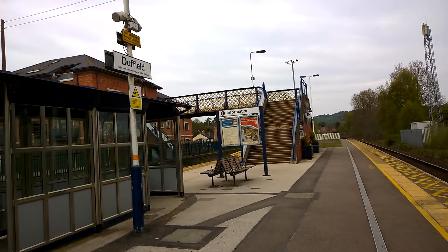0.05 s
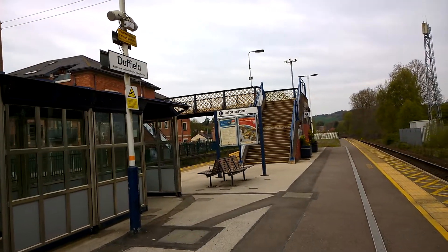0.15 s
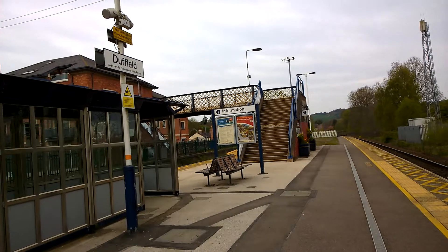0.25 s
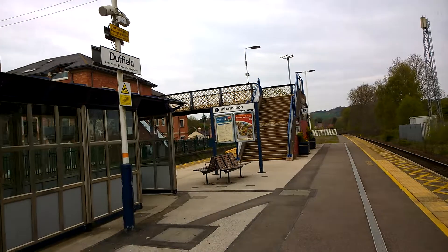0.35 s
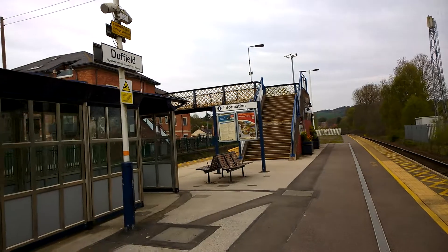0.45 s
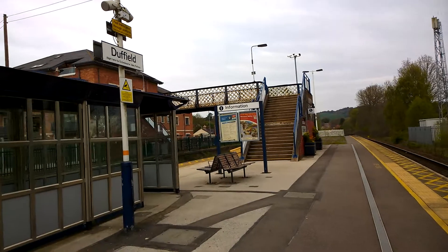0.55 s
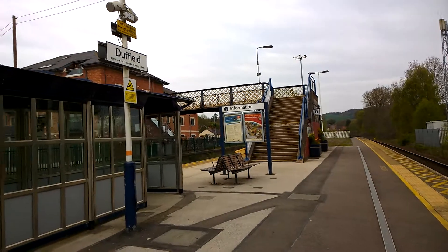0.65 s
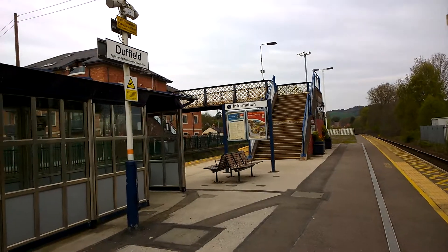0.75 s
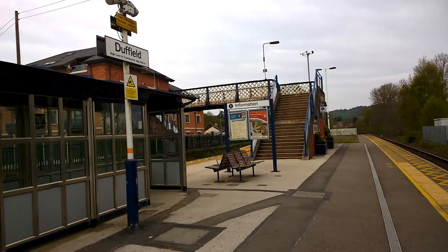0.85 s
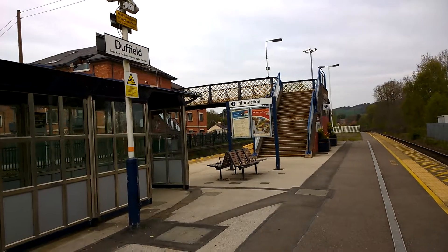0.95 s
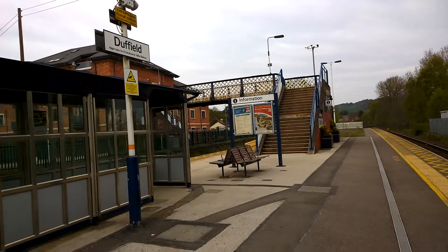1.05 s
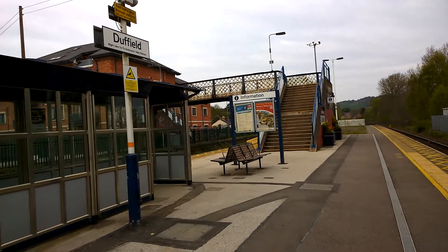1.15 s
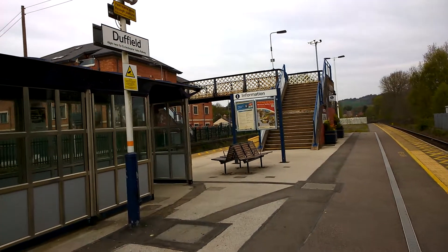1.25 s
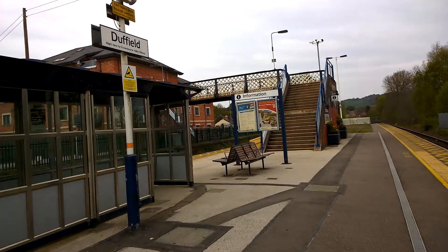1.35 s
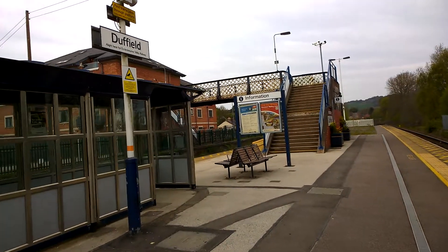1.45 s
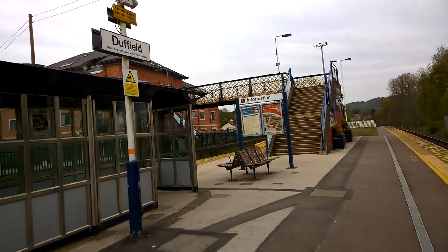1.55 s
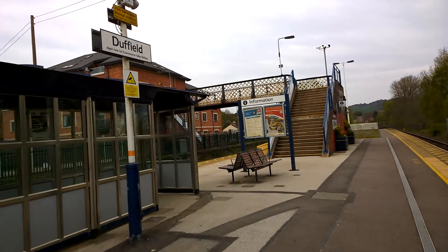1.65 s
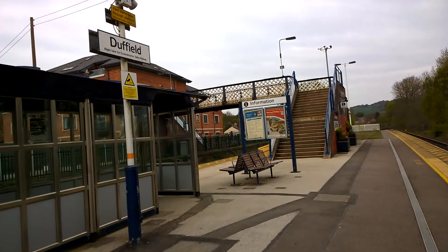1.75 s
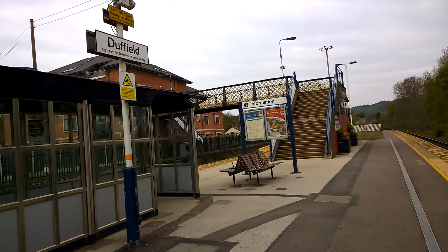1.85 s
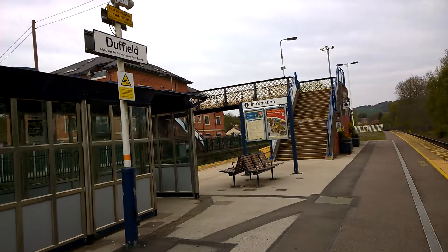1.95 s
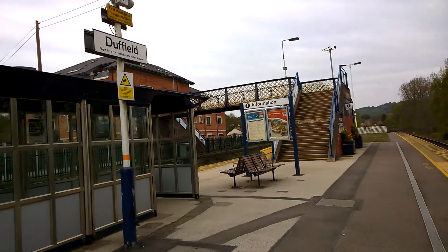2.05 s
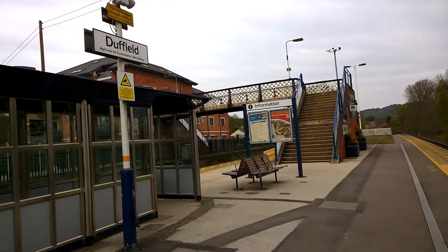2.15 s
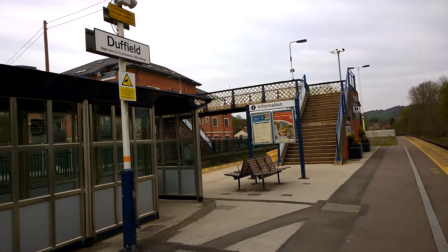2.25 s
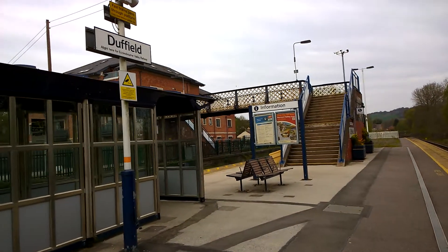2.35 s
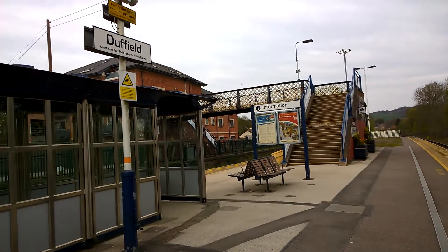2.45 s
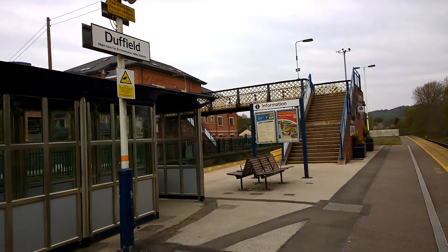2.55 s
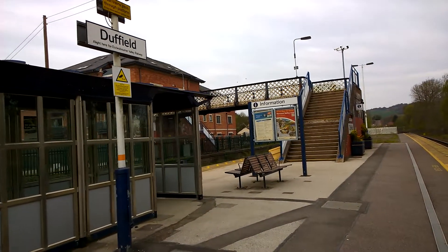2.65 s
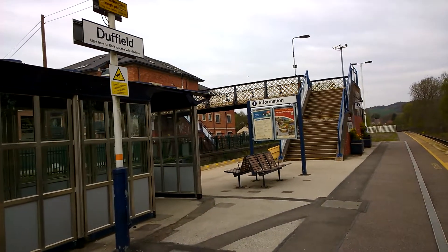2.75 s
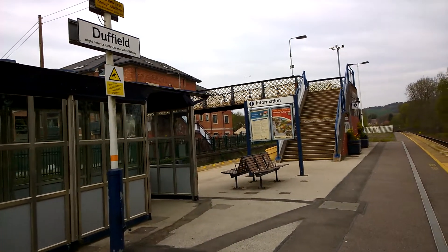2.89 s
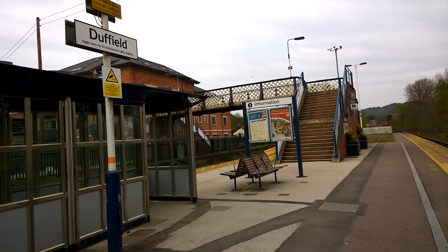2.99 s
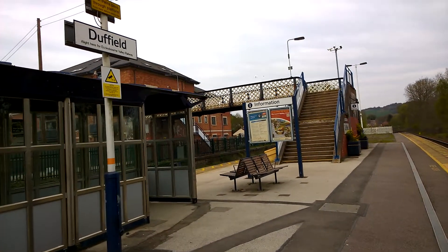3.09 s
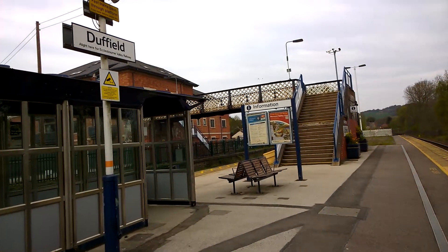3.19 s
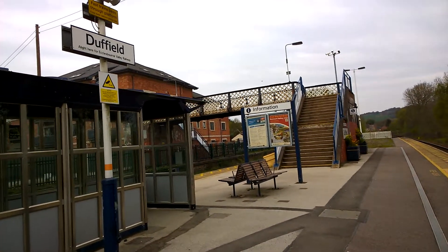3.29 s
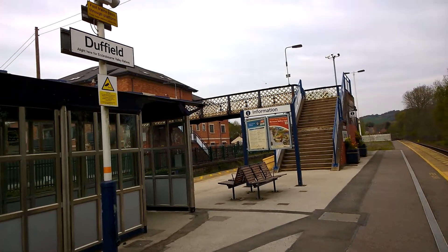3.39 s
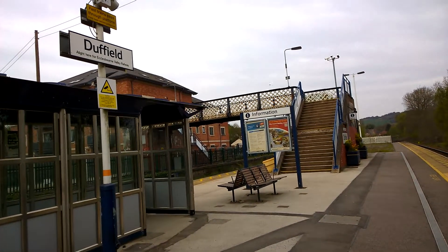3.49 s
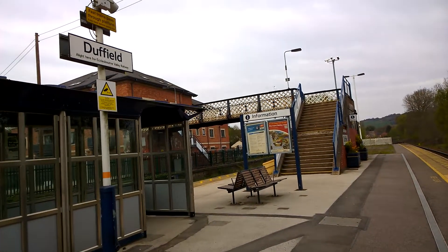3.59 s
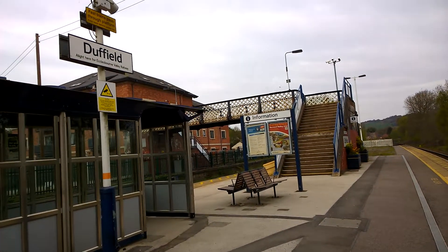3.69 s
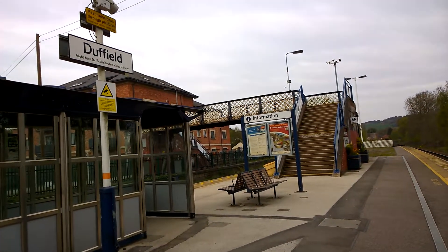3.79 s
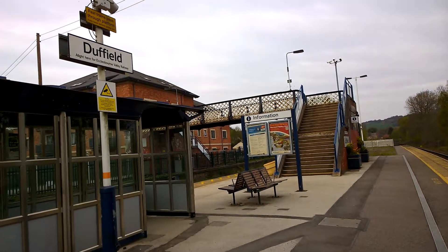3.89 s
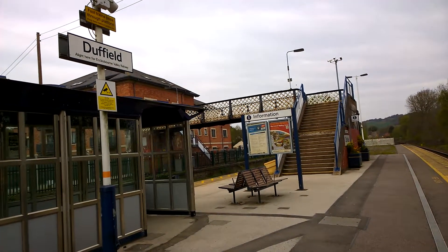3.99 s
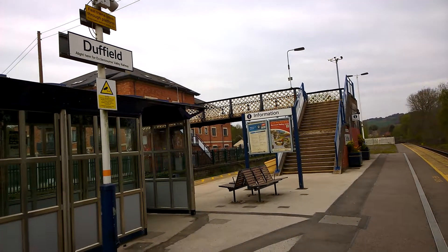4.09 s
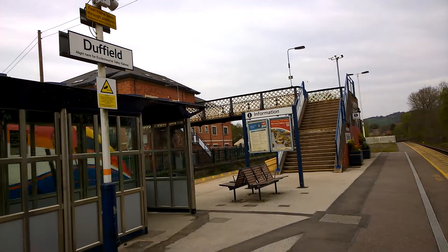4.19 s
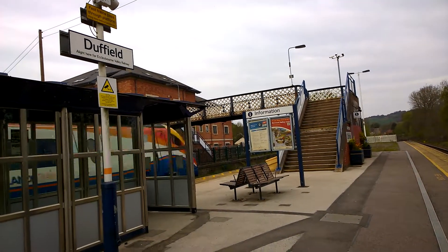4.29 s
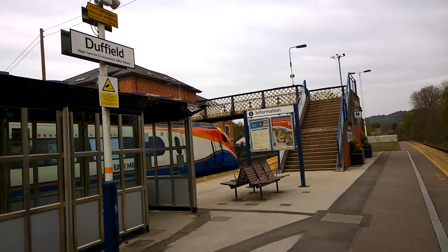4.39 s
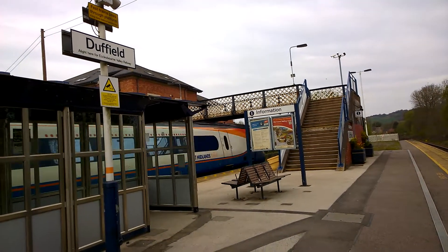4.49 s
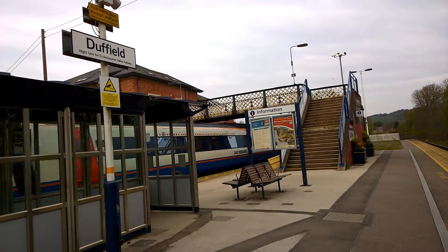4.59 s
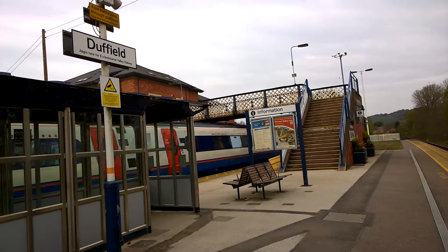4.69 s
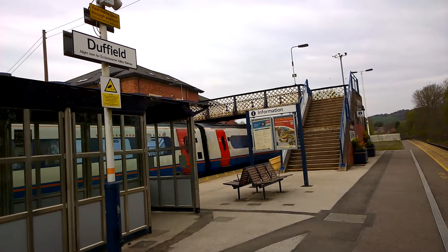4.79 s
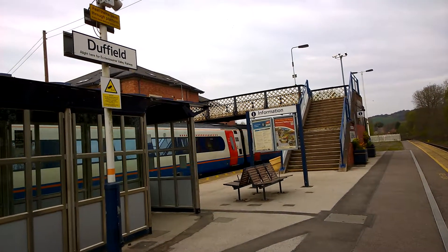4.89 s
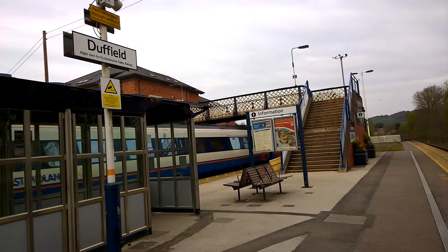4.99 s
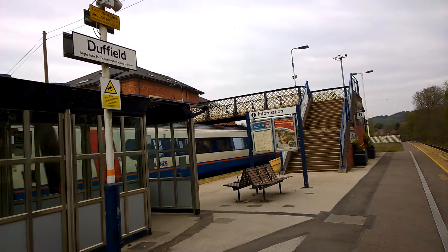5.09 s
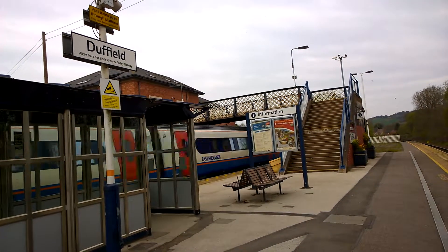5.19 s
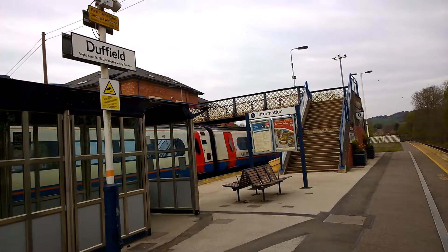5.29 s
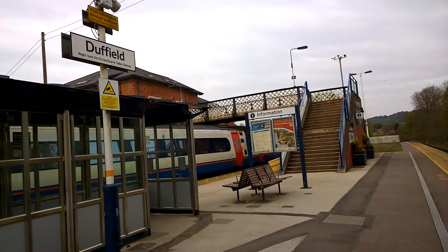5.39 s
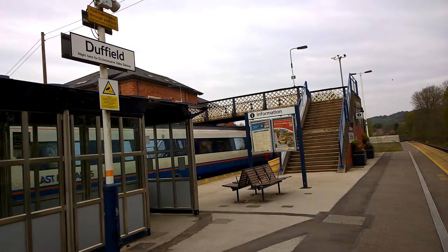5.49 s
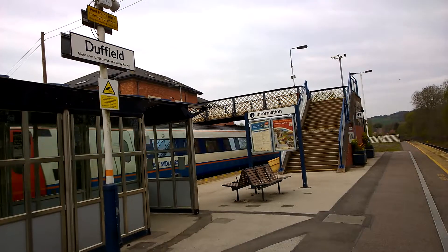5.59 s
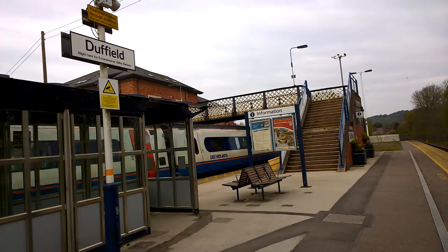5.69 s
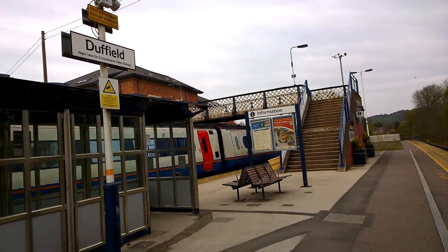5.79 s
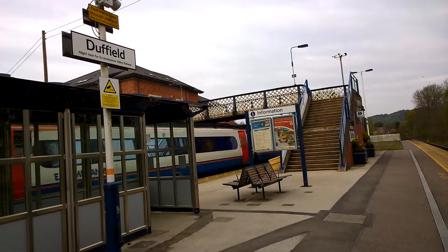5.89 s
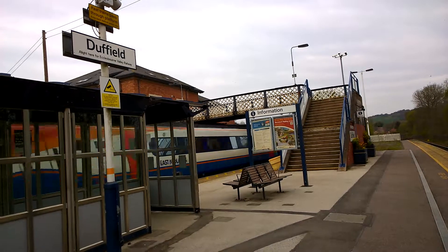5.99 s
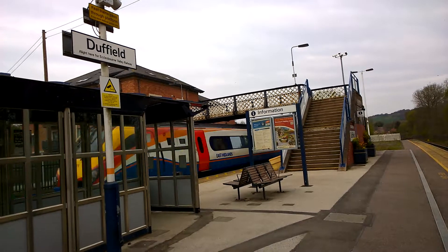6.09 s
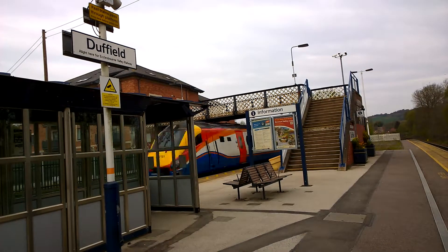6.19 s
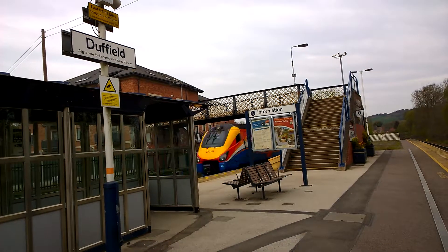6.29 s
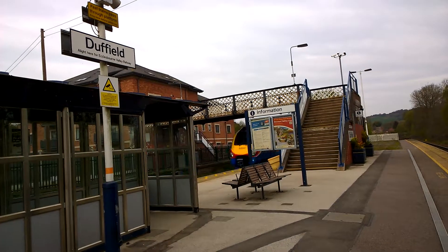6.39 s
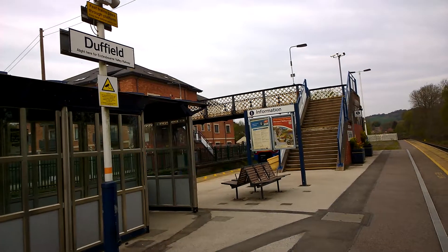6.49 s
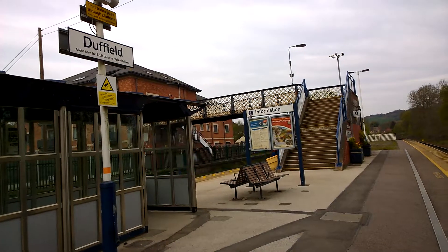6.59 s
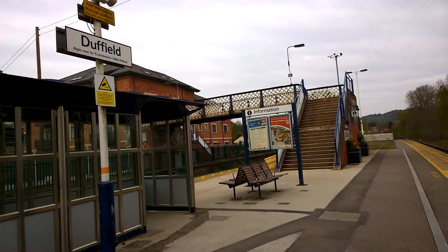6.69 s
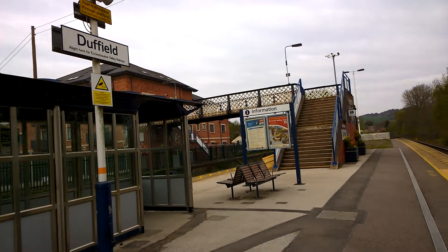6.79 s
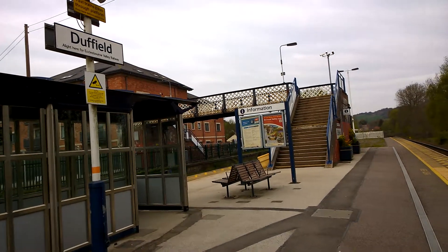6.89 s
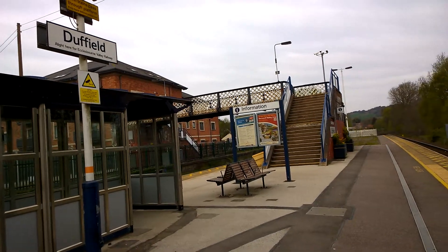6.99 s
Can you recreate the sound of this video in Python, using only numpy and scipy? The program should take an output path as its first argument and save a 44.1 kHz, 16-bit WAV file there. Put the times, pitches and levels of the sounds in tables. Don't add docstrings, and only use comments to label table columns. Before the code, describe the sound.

Open air at a station platform, heard through two close microphones partly behind a glass shelter. For the first two seconds there is a faint low rumble and hum, with small wind thumps around 0.3 to 0.7 s and 1.3 s and barely audible puffs of air. From about 2.4 s the rolling noise and engine hum rise steadily, swelling strongly after 3.5 s. At about 4 s the diesel train bursts past on the far track: a full, bright roar of wheels on rails. Engines sweep by near 4.3, 4.8, 5.3 and 5.7 s, with uneven flares of hiss, the strongest around 4.6 and 4.8 s, low exhaust booms and thin high whistles sliding down. Around 5.7 s the hum drops in pitch. After 5.9 s the roar falls away quickly, leaving a duller rush, low hum and faint whistle receding until 7 s.

```python
import sys
import numpy as np
from scipy import signal
from scipy.io import wavfile
from scipy.ndimage import uniform_filter1d

SR = 44100
rng = np.random.default_rng(int(sys.argv[2]) if len(sys.argv) > 2 else 0)


def inscribe(sig):
    pcm = np.round(np.clip(np.atleast_2d(sig).T, -1, 1) * 32767)
    wavfile.write(sys.argv[1], SR, pcm.astype(np.int16))


def boost_factor(decibels):
    exponent = np.asarray(decibels, float) / 20
    return 10 ** exponent


N = 310905


def evened(x):
    return x / np.sqrt(np.mean(x ** 2) + 1e-20)


def read(points, hz):
    f, value = np.transpose(points)
    return np.interp(np.log(hz + 1), np.log(f + 1), value)


def follow(rows, t):
    s, *columns = np.transpose(rows)
    return np.array([np.interp(t, s, column) for column in columns])


def swells(rows, t):
    return np.sqrt(sum(boost_factor(2 * db) * np.exp(-2 * (2 * (t - s) / length) ** 2) for s, db, length in rows))


def resonate(x, hz, width):
    turn = np.exp(2j * np.pi * np.cumsum(hz * np.ones(len(x))) / SR)
    r = np.exp(-np.pi * width / SR)
    smooth = signal.lfilter([1 - r], [1, -r], x / turn)
    smooth = signal.lfilter([1 - r], [1, -r], smooth)
    return 2 * (turn * smooth).real


def cells(size):
    return np.fft.rfftfreq(size, 1 / SR), np.arange(4 * N // size + 5) * size / 4 / SR


# time in seconds, place (0 far down the line, 1 coming, 2 beside the platform, 3 gone).
PLACE = [(0, 0), (1.3, 0), (2.4, 1), (3.3, 1), (4.05, 2), (5.8, 2), (6.05, 3), (7.05, 3)]


def by_place(spectra, hz, t):
    share = np.maximum(1 - abs(follow(PLACE, t) - np.arange(len(spectra))[:, None]), 0)
    return np.array([read(s, hz) for s in spectra]).T @ share


# time in seconds, nearness in dB against its loudness beside the platform.
NEARNESS = [(0, -46), (.5, -35.5), (1.0, -32.5), (1.5, -28.5), (1.95, -26), (2.4, -18.5), (3.2, -12),
            (3.6, -5), (3.78, -2), (3.92, 0.5), (4.4, -1.5), (4.9, 1.5), (5.45, -0.5), (5.85, -6),
            (6.1, -12), (6.4, -13.5), (6.7, -18.5), (7.05, -24)]


def nearness(t):
    return follow(NEARNESS, t)[0]


# peak in seconds, hiss in dB, fizz in dB, rise and
# fall in seconds per 10 dB.
FLARES = [
    (4.07, -34.5, -44.5, .08, 0.2),
    (4.26, -35, -42.5, 0.068, 0.23),
    (4.45, -28, -50, .1, 0.07),
    (4.575, -18, -36.5, 0.084, 0.0847),
    (4.68, -25.5, -40, 0.12, 0.08),
    (4.819, -21.5, -31, 0.17, 0.0066),
    (5.18, -26.5, -42, 0.24, 0.0035),
    (5.292, -34, -35, 0.11, 0.0057),
    (5.68, -54, -46.5, 0.036, 0.16),
]


def flares(t):
    power = 0
    for s, hiss_db, fizz_db, rise, fall in FLARES:
        loss_db = 10 * np.maximum((s - t) / rise, (t - s) / fall)
        power = power + boost_factor(2 * (np.array([[hiss_db], [fizz_db]]) - loss_db))
    return power


# time square to the ports in seconds, time hidden by the shelter in seconds, whistle in dB.
ENGINES = [
    (4.33, 4.395, -41),
    (4.804, 4.83, -48),
    (5.273, 5.322, -41.5),
    (5.72, 5.78, -46),
]
AHEAD, NEARING = (9.9, 9.6, 0.9), (13.7, 13.9, 0.96)
ENTERING, LEAVING, AWAY = (17.9, 11.5, 0.6), (14.3, 20.4, 0.7), (2.8, 36.2, 0.58)


def sweep(t):
    jump = 0.04
    depart = 5.93
    rows = [(0, *AHEAD), (2.6, *AHEAD), (3.9, *NEARING), (3.95, *NEARING)]
    for square, _, _ in ENGINES:
        rows += [(rows[-1][0] + jump, *ENTERING), (square + jump / 2, *LEAVING)]
    rows += [(depart, *LEAVING), (depart + jump, *AWAY)]
    bass_lag, treble_lag, focus = follow(rows, t)
    hiss = flares(t)[0]
    return bass_lag, treble_lag, focus + (1 - focus) * hiss / (hiss + boost_factor(2 * -31))


# frequency in Hz, level in dB.
FAR_RIGHT = [(118, -4), (465, 2), (2300, -4), (2900, 8), (3300, 10), (4500, -2), (6100, -10), (7500, -7),
             (8900, 14), (11100, -1), (12900, -15), (15500, -8)]
COMING_RIGHT = [(118, 0), (835, -1), (1900, -5.5), (3300, 10), (4500, -4), (6300, 6.5), (9100, -8),
                (10100, -6), (12300, -14), (13500, -7), (14700, -10), (15500, -13)]
BESIDE_RIGHT = [(118, -2.8), (835, -0.5), (2300, -2.5), (3300, 7.5), (4500, -6), (6300, 8.5), (7900, -5),
                (9100, -1), (10300, 2), (12700, -4), (13300, -12), (15500, -11)]
GONE_RIGHT = [(200, -2), (465, 1), (1234, -6), (1900, 3.5), (2500, -4), (2900, 8), (4500, -10.5),
              (6300, 3.5), (7700, -4), (10500, 6.6), (14700, -15), (15500, 1)]
# frequency in Hz, share alike from 0 to 1.
LIKENESS = [(25, 0.98), (200, 1), (700, 0.96), (1700, 0.63), (3000, 0.76), (6000, 0.75), (12000, 0.52)]


def right_port(hz, t):
    bass_lag, treble_lag, focus = sweep(t)
    shade_db = by_place([FAR_RIGHT, COMING_RIGHT, BESIDE_RIGHT, GONE_RIGHT], hz, t)
    shade_db += 0.07 * np.outer(hz / 10000, treble_lag.clip(14, 21) - 16) * (t < 5.94)
    shade_db[hz < 130] = -2.0
    shade = np.log(boost_factor(shade_db))
    causal = -signal.hilbert(np.vstack([shade, shade[-2:0:-1]]), axis=0).imag[:len(hz)]
    above_hz = np.maximum(hz - 1300, 0)[:, None]
    turns = (hz[:, None] * bass_lag + above_hz * (treble_lag - bass_lag)) / SR
    blur = np.clip(focus, 0, 1) ** (hz / 2500)[:, None]
    alike = np.clip(read(LIKENESS, hz)[:, None] * blur, 0, 1)
    return np.exp(shade), np.exp(1j * (causal - 2 * np.pi * turns)), alike


def middle_share(hz, t):
    gain, turn, alike = right_port(hz, t)
    return (1 + gain ** 2 + 2 * gain * alike * turn.real) / 4


def at_ports(power, size, patchy_db):
    hz, t = cells(size)
    gain, turn, alike = right_port(hz, t)
    a, b, c, d, patches = rng.standard_normal((len(t), len(hz), 5)).T
    patches = uniform_filter1d(patches, size=5, axis=0)
    patches = evened(uniform_filter1d(patches, size=9, axis=1))
    left = a + 1j * b
    right = gain * (alike * turn * left + np.sqrt(1 - alike ** 2) * (c + 1j * d))
    white = np.sqrt(3 / 2)
    z = white * np.array([left, right]) * np.sqrt(power) * boost_factor(patchy_db * patches)
    return signal.istft(z, nperseg=size, noverlap=3 * size // 4)[1][:, :N]


# time in seconds, level in dB, length in seconds.
GUSTS = [
    (0.303, -41, 0.099),
    (0.506, -32.5, 0.097),
    (0.645, -36, 0.067),
    (1.32, -38, 0.055),
    (1.9, -52, 0.12),
]


def wind():
    band = signal.butter(2, [30, 110], "band", fs=SR)
    lumps = signal.lfilter(*band, rng.standard_normal((2, N)))
    return swells(GUSTS, np.arange(N) / SR) * evened(lumps) * boost_factor([[2.5], [-6.0]])


# time in seconds, level in dB, length in seconds.
PUFFS = [
    (.045, -70, 0.094),
    (.39, -62, 0.16),
    (.61, -63, 0.11),
    (.825, -62, .09),
    (1.53, -63, 0.1),
    (1.68, -60.5, 0.3),
    (1.91, -67, .18),
    (.9, -77, 2.5),
    (2.2, -79, 0.27),
]


def valve():
    level = boost_factor(2.5) * swells(PUFFS, np.arange(N) / SR)
    left, right, high = rng.standard_normal((3, N))
    left = boost_factor(-15) * evened(resonate(left, 6500, 5000))
    right = evened(resonate(right, 6200, 950)) + boost_factor(-23) * evened(resonate(high, 11000, 1500))
    return level * np.array([left, right])


# time in seconds, level in dB, pitch in Hz, width in Hz, length in seconds.
BOOMS = [
    (4.04, -25, 350, 130, .1),
    (4.34, -21, 480, 130, .14),
    (4.5, -27, 290, 70, .12),
    (4.8, -21, 365, 60, .1),
    (5.27, -19.5, 480, 140, .11),
    (5.74, -23, 390, 70, .14),
]


def booms():
    t, out = np.arange(N) / SR, np.zeros(N)
    for s, db, hz, width, length in BOOMS:
        noise = evened(resonate(rng.standard_normal(N), hz, width))
        out += boost_factor(db) * noise * np.exp(-(2 * (t - s) / length) ** 2)
    return np.array([out, boost_factor(-1) * np.roll(out, 15)])


# time in seconds, level in dB, length in seconds, pitch in Hz, width in Hz.
TURBO_FAR = [
    (3.15, -68, .6, 9600, 70),
    (3.982, -48.5, 0.3, 9900, 250),
    (5.498, -53, .2, 10100, 250),
    (6.1, -60, 0.33, 9900, 120),
    (6.2, -66, .5, 8350, 110),
    (6.6, -58, .25, 8330, 90),
    (6.9, -65.5, .5, 8300, 90),
]


def turbo():
    pitch_hz, shift, pass_s = 9100, 0.084, 0.071
    width_hz, smear_hz = 360, 150
    hold_s, rise_db_per_s, hide_db_per_s = 0.17, 110, 387
    hz, t = cells(size=512)
    whistles = [(f + 0 * t, w, swells([(s, db, length)], t)) for s, db, length, f, w in TURBO_FAR]
    for square, hidden, db in ENGINES:
        away = (t - square) / pass_s
        loss_db = rise_db_per_s * (square - hold_s - t).clip(0) + hide_db_per_s * (t - hidden).clip(0)
        falling_hz = pitch_hz * (1 - shift * away / np.sqrt(1 + away ** 2))
        whistles.append((falling_hz, width_hz + smear_hz / (1 + away ** 2), boost_factor(db - loss_db)))
    power = 0
    for f, w, level in whistles:
        shape = np.exp(-((hz[:, None] - f) / w) ** 2)
        power = power + shape / (shape.sum(0) + 1e-9) * level ** 2
    return at_ports(power * boost_factor(8), size=512, patchy_db=1.5)


# time in seconds, level in dB, length in seconds.
FIRING = [(0.01, -41, 0.27), (.45, -49, .25), (.8, -46, .25), (1.552, -38, 0.42), (2.02, -42, .25),
          (2.62, -26.5, 0.66), (3.03, -25.5, 0.33), (3.604, -20, 0.51), (4.03, -17.5, 0.37),
          (4.398, -19.5, 0.33), (4.725, -22, 0.81), (5.102, -19.5, 0.49), (5.487, -14.5, 0.41),
          (6.008, -20.5, 0.33), (6.85, -29.5, 0.97)]
OCTAVE = [(0.01, -51.5, 0.19), (.8, -46, .3), (1.35, -36.5, 0.59), (1.8, -43, 0.38), (2.45, -36, 0.7),
          (3.02, -33.5, 0.55), (3.6, -37.5, 0.25), (4.05, -24.5, 0.47), (4.6, -25.5, 0.23),
          (5.1, -22, 0.29), (5.45, -30.5, 0.23), (5.78, -27, 0.3), (6.02, -27.5, 0.29), (6.45, -29.5, 0.47),
          (6.85, -33.5, 0.48)]
FIVE_THIRDS = [(.7, -49.5, .45), (1.2, -42, 0.36), (1.8, -44, .3), (2.4, -36, 0.25), (3.02, -32.5, 0.36),
               (3.6, -30, .4), (4.5, -39, 0.29), (5.1, -31, 0.27), (5.97, -28.5, .3), (6.8, -39, 0.81)]


def hum():
    coming_hz, gone_hz, drop_s, pass_s = 103.46, 78.5, 5.67, 0.201
    wander = 0.3
    t = np.arange(N) / SR
    hz = gone_hz + (coming_hz - gone_hz) * (1 - np.tanh((t - drop_s) / pass_s)) / 2
    lag = sweep(t)[0]
    port_lags = np.array([0 * lag, lag])
    out = np.zeros((2, N))
    for order, rows in zip((1, 2, 5 / 3), (FIRING, OCTAVE, FIVE_THIRDS)):
        slow = uniform_filter1d(rng.standard_normal(N), size=5000)
        drift = wander * evened(uniform_filter1d(slow, size=5000))
        phase = 2 * np.pi * order * (np.cumsum(hz) - port_lags * hz) / SR + drift
        out += np.sqrt(2) * swells(rows, t) * np.sin(phase)
    return out * boost_factor([[1.0], [-1.0]])


# frequency in Hz, level in dB.
COOLER_COLOUR = [(2500, -30), (4300, -15), (5300, 9), (6000, 7), (6800, 5.5), (8000, 1), (12000, -12),
                 (17000, -13)]


def coolers():
    hz, t = cells(size=512)
    doppler = 1 - 0.018 * (sweep(t)[1].clip(14, 21) - 14)
    colour = boost_factor(2 * read(COOLER_COLOUR, hz[:, None] / doppler)) * (hz > 2000)[:, None]
    steady = boost_factor(2 * (-39.5 + 1.8 * nearness(t)))
    level = flares(t)[0] + steady
    power = colour / (colour * middle_share(hz, t)).sum(0) * boost_factor(2 * -3.5) * level
    return at_ports(power, size=512, patchy_db=0.8)


# level beside the platform in dB, dB per dB of nearness coming,
# the same leaving, still-air floor in dB.
LAYERS = [
    (-16.5, .45, 0.45, -46),
    (-23.5, 0.84, .9, -46.5),
    (-32.5, 0.9847, 0.99, -71),
    (-49, 2, 1.41, -93),
]
# time in seconds, rumble in dB, roll in dB, length in seconds.
SURGES = [(0.297, -34.5, -63, 0.17), (1.596, -32, -60, 0.3), (2.71, -26, -48.5, .3),
          (3.064, -22, -44, 0.43), (3.705, -15.5, -34, 0.44), (3.95, -20.5, -22, 0.41),
          (4.405, -18, -24, 0.38), (5.155, -20.5, -32, 0.22), (5.598, -17, -33, 0.27),
          (5.87, -22, -27.5, 0.22), (6.05, -21, -46, 0.26)]


def layer_levels(t):
    db, coming, leaving, floor_db = np.transpose(LAYERS)[:, :, None]
    slope = np.where(t < 4.9, coming, leaving)
    power = boost_factor(2 * (db + slope * nearness(t))) + boost_factor(2 * floor_db)
    rumble = swells([(s, rumble_db, length) for s, rumble_db, _, length in SURGES], t) ** 2
    roll = swells([(s, roll_db, length) for s, _, roll_db, length in SURGES], t) ** 2
    hiss, fizz = flares(t)
    return 10 * np.log10(power + np.array([rumble, roll, boost_factor(2 * -7) * hiss, fizz]))


# bottom in Hz, top in Hz.
BANDS_HZ = [(25, 250), (250, 2000), (2000, 5000), (10500, 15800)]
BAND_CENTRES_HZ = [90, 700, 3200, 12500]
# frequency in Hz, level in dB per Hz.
FAR = [(25, 1), (54, 5), (118, -12.5), (213, -17), (315, -23.5), (687, -33.5), (1015, -33.5), (2100, -45),
       (3500, -63.5), (7500, -67), (8300, -81), (9700, -81), (11300, -67), (15500, -86)]
COMING = [(25, -11.5), (44, -6), (97, -13.5), (144, -18), (213, -16), (565, -24), (835, -24.5), (3300, -40),
          (4700, -39.5), (7300, -48.5), (8600, -55.5), (10700, -60), (13000, -63.5), (15500, -83)]
BESIDE = [(25, -5.5), (97, -6.5), (118, -11), (383, -16), (687, -18.5), (1500, -22), (2300, -22.5),
          (2700, -25.5), (4100, -28.5), (5700, -32.5), (7200, -34), (8600, -36.5), (11000, -43.5),
          (15500, -50)]
GONE = [(25, -10), (80, -8), (97, -12.5), (144, -13.5), (383, -13.5), (565, -25), (835, -16.5), (3100, -32),
        (4900, -37.5), (7500, -48), (8300, -45.5), (10700, -63), (12700, -72), (15500, -88)]
# frequency in Hz, width in Hz, lift in dB far, coming, beside and gone.
RINGS = [(391, 29, 4.5, 1, 4.5, 0.89), (605, 160, 1.5, -2, -2.5, 2.3), (827, 118, 8, 4, 3, 5.9),
         (1340, 196, -2.5, 1, -2.5, 0.16), (1704, 176, 0.5, 8, 2, 5), (2290, 110, 3, 1.5, 3, 0.76),
         (3670, 200, 1.5, 3, 4, 1.1), (4770, 190, 4, 5.5, 4, 1.4)]


def roar(size, treble, patchy_db):
    hz, t = cells(size)
    colour_db = by_place([FAR, COMING, BESIDE, GONE], hz, t)
    place = follow(PLACE, t)[0]
    for f, width, *lifts_db in RINGS:
        bell = np.exp(-((hz[:, None] - f) / width) ** 2)
        colour_db = colour_db + bell * np.interp(place, range(len(lifts_db)), lifts_db)
    colour = boost_factor(2 * colour_db) * ((hz > 18) & (hz < 15900))[:, None]
    middle = colour * middle_share(hz, t)
    have_db = [10 * np.log10(middle[(hz >= lo) & (hz < hi)].sum(0)) for lo, hi in BANDS_HZ]
    spread = np.array([read(list(zip(BAND_CENTRES_HZ, row)), hz) for row in np.eye(len(BANDS_HZ))]).T
    power = colour * boost_factor(2 * spread @ (layer_levels(t) - have_db))
    hidden = np.outer(np.clip((hz - 7800) / 800, 0, 1), t < 2.86)
    power = power * boost_factor(2 * -7 * hidden)
    upper = np.clip((hz - 300) / 300, 0, 1)[:, None]
    return at_ports(power * (upper if treble else 1 - upper), size, patchy_db)


def scene():
    rolling = roar(size=4096, treble=False, patchy_db=-0.04)
    rolling = rolling + roar(size=1024, treble=True, patchy_db=1.48)
    return wind() + valve() + booms() + turbo() + hum() + coolers() + rolling


def low_pass(x):
    return signal.sosfilt(signal.butter(12, 15950, fs=SR, output="sos"), x)


def record(dry):
    hiss = boost_factor(-78.5) * rng.standard_normal(dry.shape)
    ceiling = 1.4
    limited = ceiling * np.tanh((dry + hiss) / ceiling)
    edge = signal.firwin(601, 15700, window=("kaiser", 9), fs=SR)
    mix = signal.oaconvolve(limited, edge[None], "same")
    return low_pass(mix)


dry = scene()
out = record(dry)
inscribe(out)
```